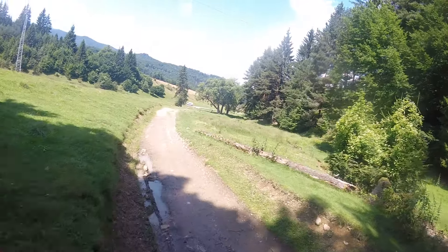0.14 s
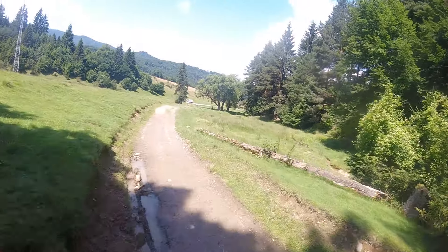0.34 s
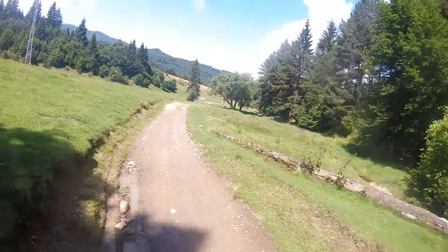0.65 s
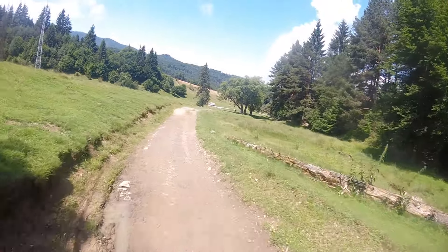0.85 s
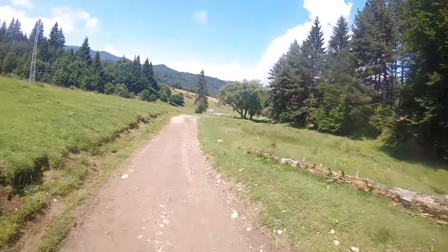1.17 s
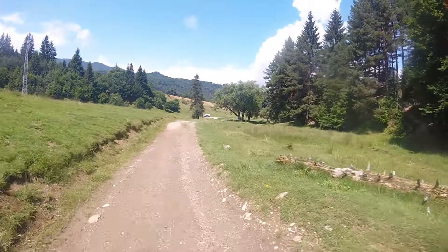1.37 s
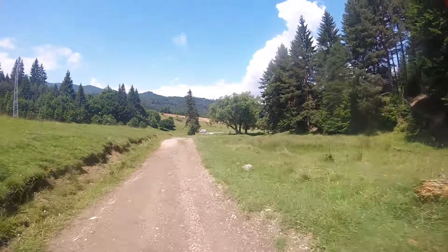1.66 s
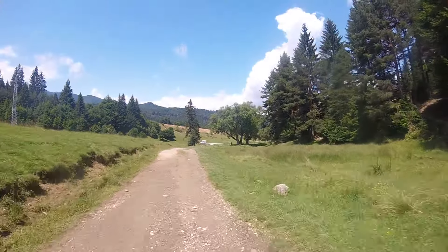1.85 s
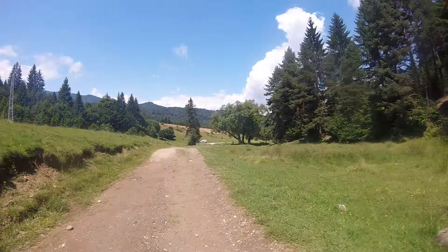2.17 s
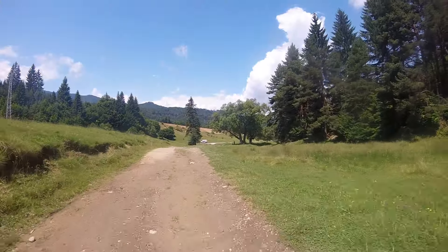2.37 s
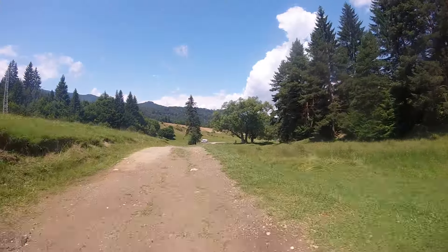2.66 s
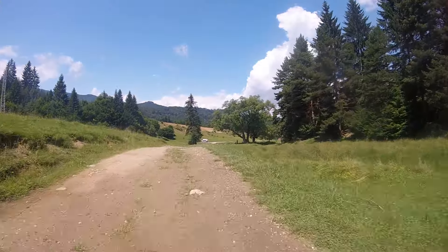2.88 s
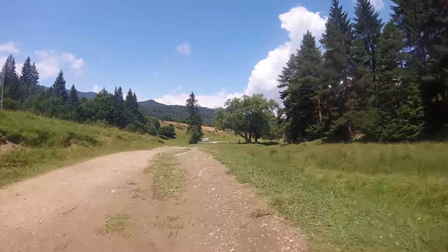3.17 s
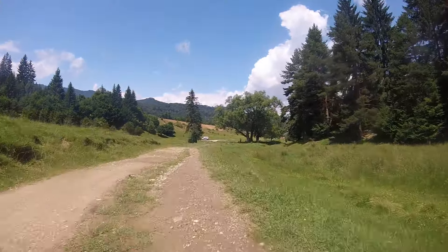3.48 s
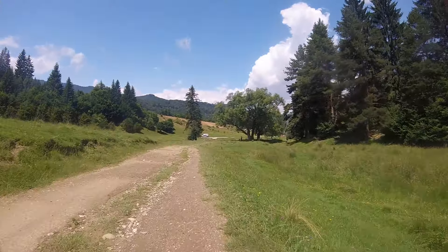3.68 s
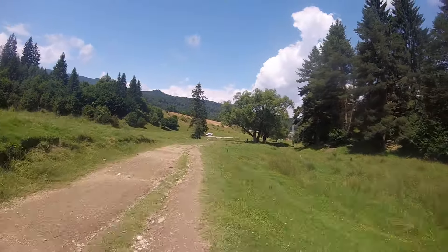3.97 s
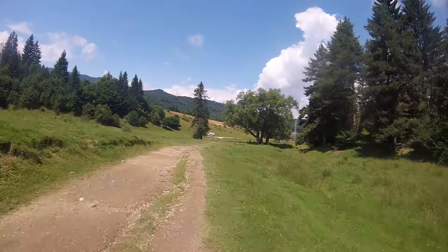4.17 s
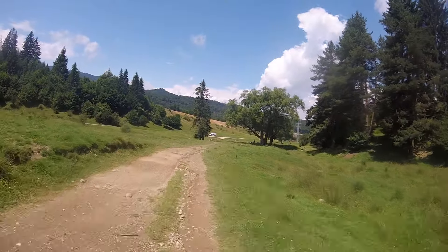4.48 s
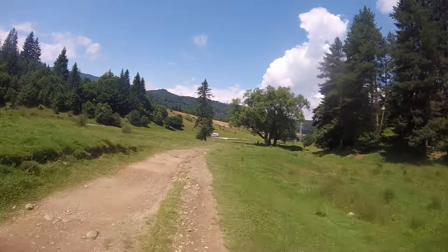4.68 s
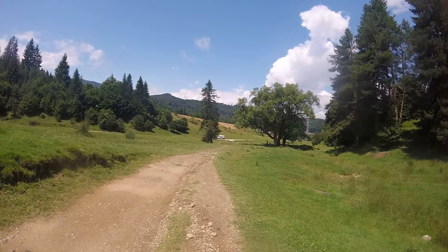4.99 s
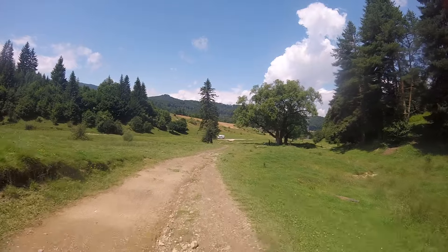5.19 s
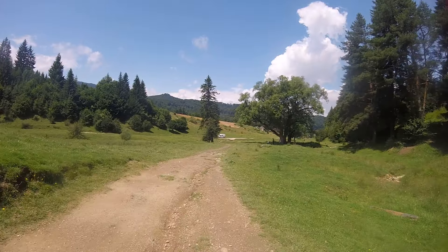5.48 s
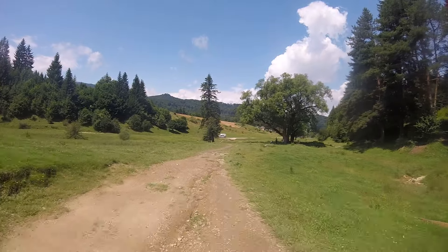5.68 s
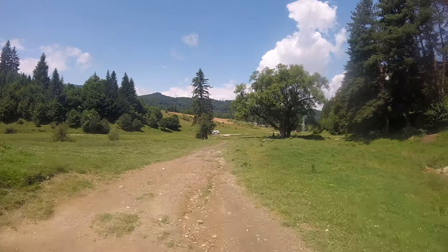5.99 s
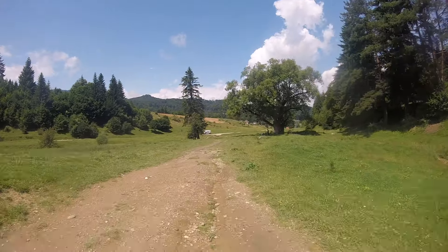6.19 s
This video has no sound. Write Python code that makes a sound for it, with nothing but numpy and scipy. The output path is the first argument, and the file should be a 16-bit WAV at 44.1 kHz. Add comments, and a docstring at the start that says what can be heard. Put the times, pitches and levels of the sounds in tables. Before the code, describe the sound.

A small quadcopter flies outdoors with the microphone on its frame. A loud low hum beats roughly as four rotors spin at slightly different speeds, topped by blade buzz, rushing air and fine hiss. It starts high, drops abruptly after a third of a second, recovers, sags near two seconds, climbs around three, then falls lower and finally rises. Wind buffets mid-way and near the end.

```python
"""A small quadcopter low over a meadow track, in open air, with the microphone on its frame beside the rotors.
It opens at high speed and drops in pitch after 0.3 s, its four three-blade propellers turning at different speeds.
Two unbalanced rotors shake the frame, so the hum beats, more slowly near 4 s; the blades chop air into rush and hiss.
Motor housings ring thinly throughout, with a higher ring coming and going from 0.4 s.
Wind buffets the microphone hardest from about 1.7 to 2.6 s and again in gusts after 5 s."""
import sys
import numpy as np
from scipy import signal
from scipy.fft import rfft, irfft, next_fast_len
from scipy.io import wavfile
from scipy.ndimage import uniform_filter1d

SR = 44100
rng = np.random.default_rng(int(sys.argv[2]) if len(sys.argv) > 2 else 0)


def master(y):
    """Save y as 16-bit WAV."""
    cut = np.clip(np.atleast_2d(y).T, -1, 1)
    pcm = np.round(cut * 32767)  # scale
    wavfile.write(sys.argv[1], SR, pcm.astype(np.int16))


N = 279413
TIME = np.arange(N) / SR  # s
CRUISE_HZ = 157  # reference rotor speed, turns per s


def gain_of(db):
    """Decibels to amplitude."""
    return 10 ** (np.asarray(db) / 20)


def evened(x):
    """Scales to rms 1."""
    return x / np.sqrt(np.mean(x ** 2) + 1e-20)


def curves(table):
    """Each column of a timed table, interpolated at every sample."""
    seconds, *columns = np.transpose(table)
    return [np.interp(TIME, seconds, column) for column in columns]


def noise(shape):
    """Noise of rms 1: white noise with its spectrum multiplied by shape(Hz)."""
    size = next_fast_len(N)
    hz = np.fft.rfftfreq(size, 1 / SR)
    spectrum = rfft(rng.standard_normal(size)) * shape(hz)
    return evened(irfft(spectrum, size)[:N])


def coloured(points):
    """Noise of rms 1 with a spectrum drawn through (frequency [Hz], level [dB]) points."""
    point_hz, point_db = np.transpose(points)
    return noise(lambda hz: gain_of(np.interp(np.log(hz + 1), np.log(point_hz), point_db)))


def wander(rate_hz):
    """Slow random movement of rms 1, up to about the given rate."""
    return noise(lambda hz: 1 / (1 + (hz / rate_hz) ** 4))


def ring(centre_hz, width_hz):
    """A narrow, thin metallic ring of a motor housing, made as narrow-band noise of rms 1."""
    return noise(lambda hz: 1 / (1 + ((hz - centre_hz) / width_hz) ** 2))


# Wind on the microphone: (time [s], level before trim [dB])
WIND_LEVEL = [(0, -39), (1.5, -37.5), (1.68, -29.5), (2.3, -27), (2.65, -32.5), (3.2, -34.5), (3.75, -41.5),
              (4.2, -41), (4.55, -35), (4.87, -39), (5.04, -27.5), (5.16, -34), (5.25, -26), (5.55, -27),
              (6, -25), (6.3, -32.5)]
# Spectrum of the buffeting: (frequency [Hz], relative level per Hz [dB])
WIND_SPECTRUM = [(10, -9.5), (25, -4.5), (65, -0.5), (110, -2.5), (250, -7), (400, -12), (700, -26),
                 (2000, -64.5)]


def wind(trim_db=4, lump_db=2, lump_hz=17):
    """Lumpy, mostly low buffeting of the microphone by the airstream."""
    level_db, = curves(WIND_LEVEL)
    buffeting = evened(coloured(WIND_SPECTRUM) * gain_of(lump_db * wander(lump_hz)))
    return gain_of(level_db + trim_db) * buffeting


# Throttle, as the mean speed of the two slower rotors before flutter: (time [s], speed [turns per s])
THROTTLE_SPEED = [(0.0, 177.63), (0.218, 177), (0.289, 177), (0.368, 146), (0.71, 153), (0.772, 173),
                  (0.904, 163), (1.092, 156.7), (1.858, 161), (1.87, 150.81), (1.971, 142.6),
                  (2.61, 159.79), (2.696, 168), (3.296, 173.3), (3.686, 155.4), (4.213, 154.8),
                  (4.618, 136.12), (4.717, 152), (4.775, 151), (5.331, 136), (5.391, 136.5), (5.756, 140),
                  (6.115, 155.7), (6.34, 158)]


def throttle_speed():
    """The speed that all four rotors follow."""
    speed, = curves(THROTTLE_SPEED)
    return speed


# Steering parts the two slower rotors: (time [s], second minus first [turns per s])
SLOW_PAIR_DIFFERENCE = [(0.0, 5.92), (0.173, 14.48), (0.285, 5.21), (0.822, 4.23), (0.929, 15.04),
                        (1.241, 9.48), (1.587, 12.08), (1.66, 8.65), (2.505, 10.85), (2.742, 9.39),
                        (2.977, 13.06), (3.197, 8.61), (3.682, 6.07), (4.001, 0.17), (4.228, 3.98),
                        (4.573, 2.63), (4.743, 9.33), (4.887, -0.35), (5.013, 3.48), (5.31, 7.64),
                        (5.336, 4.2), (5.894, 8.78), (5.99, 11.1), (6.34, 4.21)]
# The two faster rotors run ahead of the throttle: (time [s], extra speed [turns per s])
THIRD_ROTOR_LEAD = [(0, 17.4), (.3, 20.5), (.72, 28.6), (.95, 23), (1.55, 28.8), (1.79, 39.6), (1.92, 33),
                    (2.4, 36.4), (2.62, 31.6), (3.62, 24.5), (4.55, 29), (4.9, 39), (5.0, 34), (5.4, 33.6),
                    (5.55, 41.7), (5.89, 30.6), (6.03, 37), (6.34, 35)]
FOURTH_ROTOR_LEAD = [(0, 51.1), (1.2, 45.96), (2.3, 53.9), (3.2, 48.03), (3.95, 53.03), (4.8, 48.02),
                     (5.3, 42.98), (6.34, 40)]


def shafts(throttle, flutter_turns=0.014, flutter_hz=20):
    """Angle of each rotor in turns; the flight controller's quick corrections make it flutter."""
    difference, = curves(SLOW_PAIR_DIFFERENCE)
    leads = [-difference / 2, difference / 2]
    leads += curves(THIRD_ROTOR_LEAD) + curves(FOURTH_ROTOR_LEAD)
    return [np.cumsum(throttle + lead) / SR + flutter_turns * wander(flutter_hz) for lead in leads]


def chop(turns, blade_depth, shaft_depth, blades=3):
    """Air noise pulses with every blade pass and, on bent blades, with every turn."""
    swing = np.zeros(N)
    for angle in turns:
        swing += blade_depth * np.cos(2 * np.pi * blades * angle)
        swing += shaft_depth * np.cos(2 * np.pi * angle)
    return evened(np.exp(swing))


# Turbulence of the air that the blades cut: (time [s], level of the rush before flare and trim [dB])
TURBULENCE_LEVEL = [(0, -34.5), (.4, -35.5), (.9, -36), (1.3, -37), (2.4, -35.3), (2.9, -35.5), (3.3, -34),
                    (4.2, -37.5), (4.75, -33.5), (5.1, -37), (5.7, -30.5), (6.34, -36.5)]


def air_levels(throttle, hiss_cruise_db=-45.5, hiss_power=1.9, flare_limit_db=1.5, flare_scale=130, flare_s=0.14):
    """Rush and hiss in dB follow turbulence and flare as rotors spin up; hiss also grows with speed."""
    turbulence_db, = curves(TURBULENCE_LEVEL)
    speed_db = 20 * np.log10(throttle / CRUISE_HZ)
    acceleration = np.maximum(np.gradient(throttle) * SR, 0)  # turns per s, per s
    spin_up = uniform_filter1d(acceleration, int(flare_s * SR))
    flare_db = flare_limit_db * np.tanh(spin_up / flare_scale)
    hiss_db = hiss_cruise_db + (turbulence_db - turbulence_db.mean()) + hiss_power * speed_db
    return turbulence_db + flare_db, hiss_db + flare_db


# Spectrum of the rush: (frequency [Hz], relative level per Hz [dB])
RUSH_SPECTRUM = [(200, -5), (400, 3), (560, -2), (680, -4.5), (820, 0.5), (1050, -0.5), (1350, -7.5),
                 (1800, -8.5), (2300, -14), (3000, -19.5), (4000, -27.5), (6000, -43.5)]


def rush(turns, level_db, trim_db=-1.04, flicker_db=1.0, flicker_hz=32):
    """Turbulence shed by the blades, pulsing as they pass."""
    air = coloured(RUSH_SPECTRUM) * chop(turns, blade_depth=0.16, shaft_depth=0.08)
    return air * gain_of(level_db + trim_db + flicker_db * wander(flicker_hz))


# Spectrum of the hiss: (frequency [Hz], relative level per Hz [dB])
HISS_SPECTRUM = [(2500, -21.5), (4200, -14.5), (5000, -2), (6200, 0.5), (6900, -1.5), (8000, -4.5),
                 (9300, -7), (10200, -12), (11200, -22), (12200, -31), (15000, -34.5)]


def hiss(turns, level_db, trim_db=0.34, flicker_db=0.35, flicker_hz=40):
    """Fine hiss from the blade tips and trailing edges, pulsing as they pass."""
    air = coloured(HISS_SPECTRUM) * chop(turns, blade_depth=0.14, shaft_depth=0.055)
    return air * gain_of(level_db + trim_db + flicker_db * wander(flicker_hz))


# A motor housing sings briefly: (start time [s], length [s], peak level [dB])
HOUSING_SINGS = [(0.404, 0.095, -53), (1.87, 0.051, -55), (2.042, 0.085, -50), (4.17, .14, -56),
                 (4.57, 0.37, -58), (5.282, 0.19, -48), (5.54, .13, -56), (5.88, .08, -49)]


def housings(hiss_db, below_hiss_db=-14):
    """One thin ring of the motors that follows the hiss, and a higher one that comes and goes."""
    swell = np.zeros(N)
    for start, length, peak_db in HOUSING_SINGS:
        position = 2 * (TIME - start) / length - 1  # -1 at the start, 1 at the end
        swell += gain_of(peak_db) * np.sqrt(np.clip(1 - position ** 2, 0, 1))
    constant_ring = gain_of(hiss_db + below_hiss_db) * ring(7132, 50)
    return constant_ring + swell * ring(7525, 45)


# How hard the blades bite the air; its departure from the median counts: (time [s], load [dB])
BLADE_BITE = [(0.03, -27.5), (0.52, -28.5), (0.55, -35), (1.04, -35), (1.3, -28), (2.51, -28), (2.88, -32),
              (3.63, -27.5), (4.39, -31), (4.62, -25.5), (4.71, -32), (6.0, -17.5), (6.02, -21.5),
              (6.3, -25)]
# Rotor overtones before wavering; multiples of three are blade passes:
# (multiple of shaft speed, first rotor [dB], second [dB], third [dB], fourth [dB])
ROTOR_OVERTONES = [(2, -41.5, -34.5, -45, -64), (3, -33, -28, -33.5, -43), (4, -49.5, -48.5, -47.5, -58.5),
                   (5, -49, -45.5, -53.5, -59), (6, -47, -44, -41, -51.5), (7, -48.5, -46.5, -64.5, -65.5),
                   (8, -58, -58, -61.5, -63), (9, -57, -54, -47, -56.5), (12, -66, -64, -55, -64),
                   (15, -71.5, -70, -64, -70.5)]


def buzz(turns, follow=0.8, gust_db=1.27, gust_hz=14, flicker_db=2.06, flicker_hz=14):
    """Overtones of each rotor waver together and singly; from the third multiple up they swell with blade load."""
    load_db, = curves(BLADE_BITE)
    bite = gain_of(follow * (load_db - np.median(load_db)))
    out = np.zeros(N)
    for rotor, angle in enumerate(turns):
        gust = gain_of(gust_db * wander(gust_hz))  # shared by all overtones of this rotor
        for multiple, *levels_db in ROTOR_OVERTONES:
            flicker = flicker_db * wander(flicker_hz)
            level = gain_of(levels_db[rotor] + flicker) * gust
            if multiple > 2:
                level = level * bite
            out += level * np.cos(2 * np.pi * (multiple * angle + rng.random()))
    return out


# How hard the two slower rotors shake the frame, before drive: (time [s], first rotor [dB], second rotor [dB])
SLOW_ROTOR_SHAKE = [(0.0, -4.37, -10.5), (0.35, -6.5, -10), (0.7, -6.5, -12), (1.7, -6, -13),
                    (2.1, -12, -8), (2.5, -6, -10.5), (3.3, -5.5, -10), (3.95, -6, -13), (4.25, -16, -6.5),
                    (4.55, -21.5, -6.5), (4.85, -10.5, -5.5), (5.35, -17, -11), (5.75, -19.18, -7),
                    (6.05, -10.5, -5), (6.34, -14.5, -6)]
# The faster rotors are nearly true; steady shake before drive: (third rotor [dB], fourth rotor [dB])
FAST_ROTOR_SHAKE = [-25, -43.5]


def hum(turns, throttle, drive_db=0.32, lopsided=0.21, octave_growth=1.5, octave_power=-2.4):
    """Unbalance shakes the frame once a turn and near speeds beat; a mount that gives more one way adds an octave."""
    levels_db = curves(SLOW_ROTOR_SHAKE) + list(FAST_ROTOR_SHAKE)
    shake = np.zeros(N, dtype=complex)
    for level_db, angle in zip(levels_db, turns):
        shake += gain_of(level_db + drive_db) * np.exp(2j * np.pi * angle)
    # twice the pitch, throbbing with the same beat
    octave = abs(shake) ** octave_growth * np.cos(2 * np.angle(shake))
    octave_level = lopsided * (throttle / CRUISE_HZ) ** octave_power  # weaker at higher speed
    return shake.real - octave_level * octave


def scene():
    """Everything rides on the frame with the microphone, in open air without echoes."""
    throttle = throttle_speed()
    turns = shafts(throttle)
    rush_db, hiss_db = air_levels(throttle)
    air = wind() + rush(turns, rush_db) + hiss(turns, hiss_db)
    rotors = buzz(turns) + hum(turns, throttle)
    return (air + housings(hiss_db) + rotors)[None]


def record(dry, ceiling_db=-7.0, knee_db=0.04, reduction=0.7, half_window_s=0.0053, edge_hz=15100):
    """The camera's limiter holds down the top of each loud beat; then its band limit removes the highest treble."""
    weights = signal.windows.hann(int(2 * half_window_s * SR) | 1)
    power = signal.oaconvolve(dry[0] ** 2, weights / weights.sum(), "same")
    level_db = 10 * np.log10(abs(power) + 1e-12)
    over_db = knee_db * np.logaddexp(0, (level_db - ceiling_db) / knee_db)  # soft corner at the ceiling
    limited = dry * gain_of(-reduction * over_db)
    low_pass = signal.firwin(511, edge_hz, window=("kaiser", 9), fs=SR)
    return signal.oaconvolve(limited, low_pass[None], "same")


dry = scene()
out = record(dry)
master(out)
```